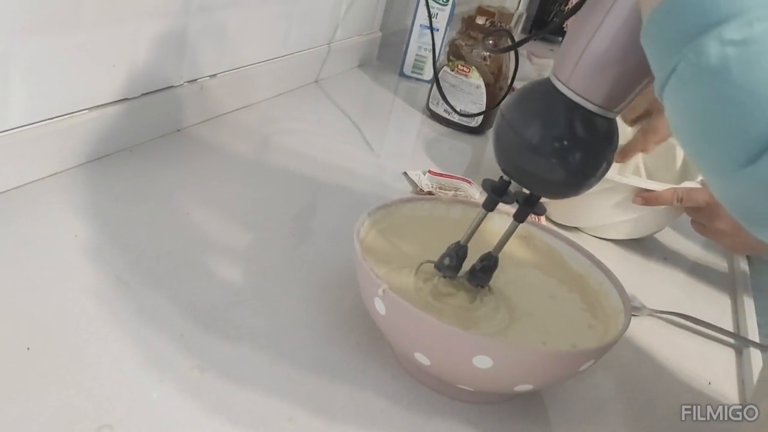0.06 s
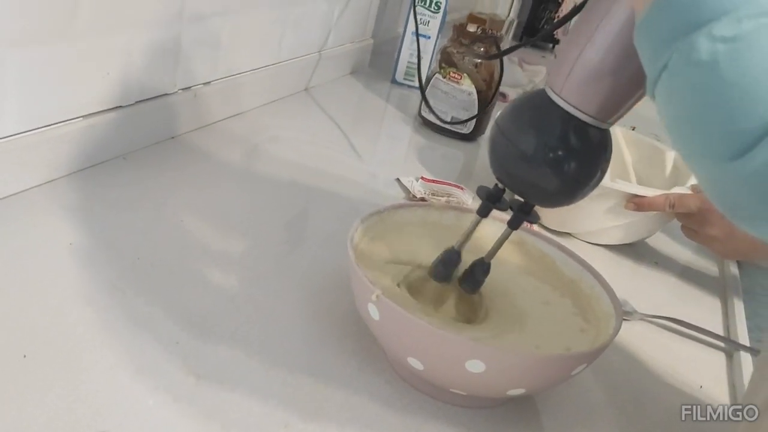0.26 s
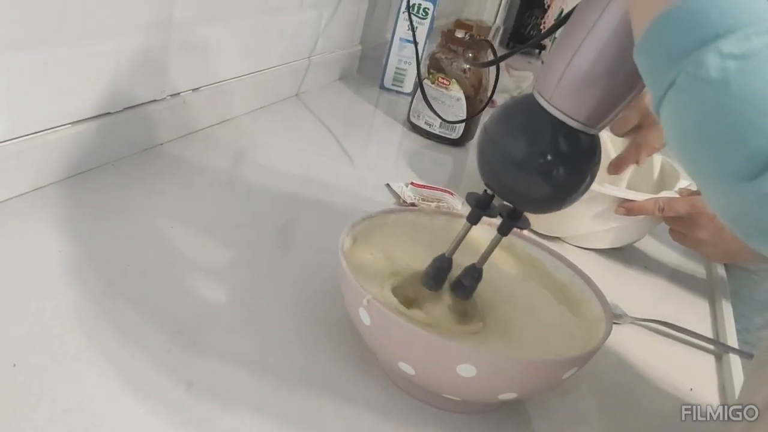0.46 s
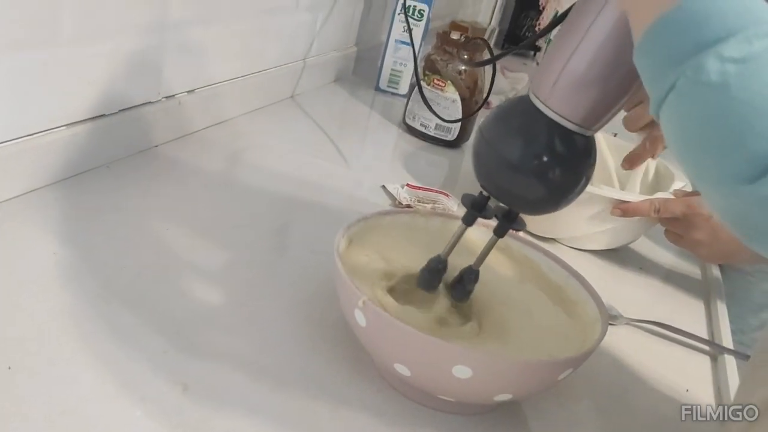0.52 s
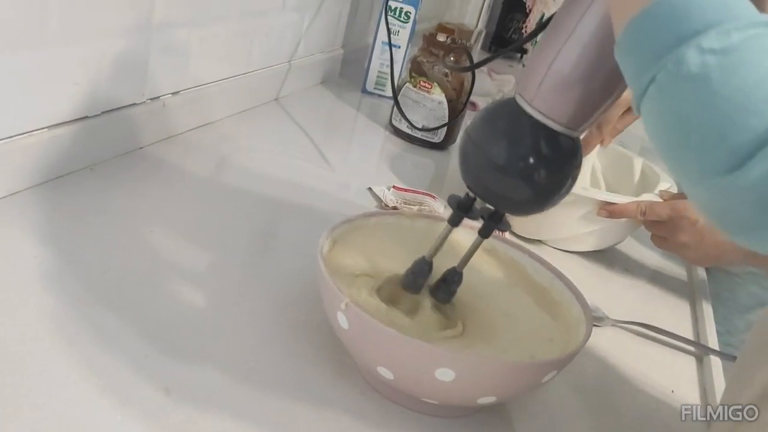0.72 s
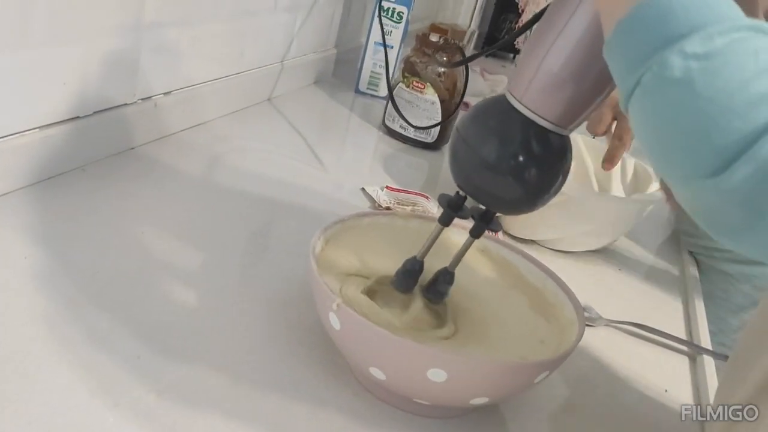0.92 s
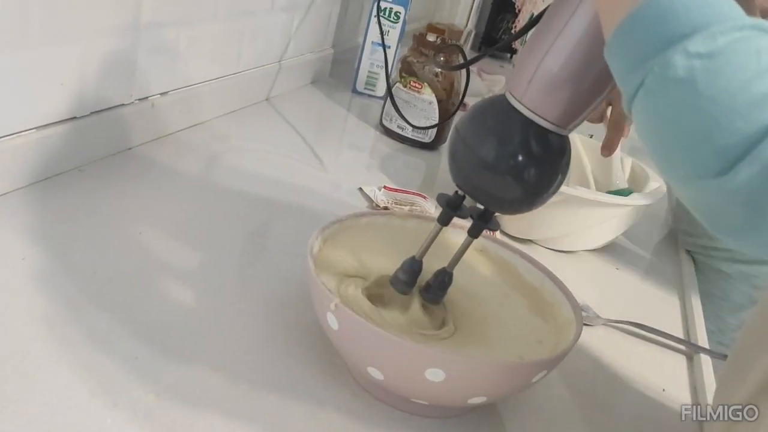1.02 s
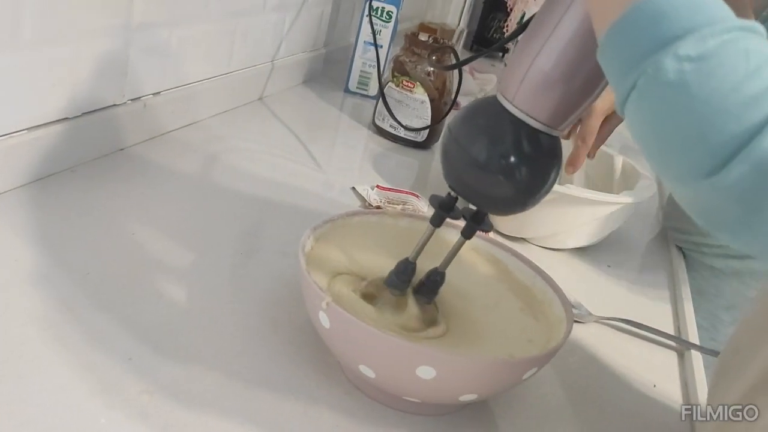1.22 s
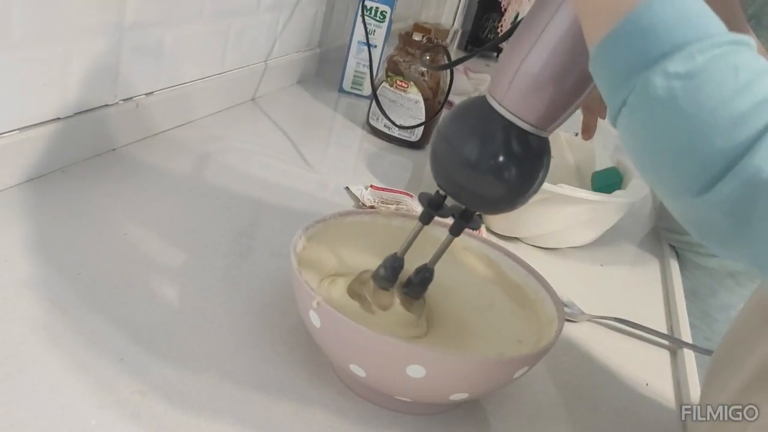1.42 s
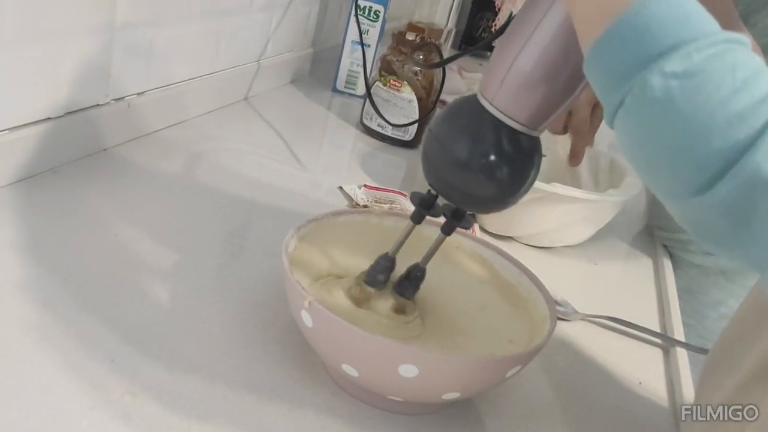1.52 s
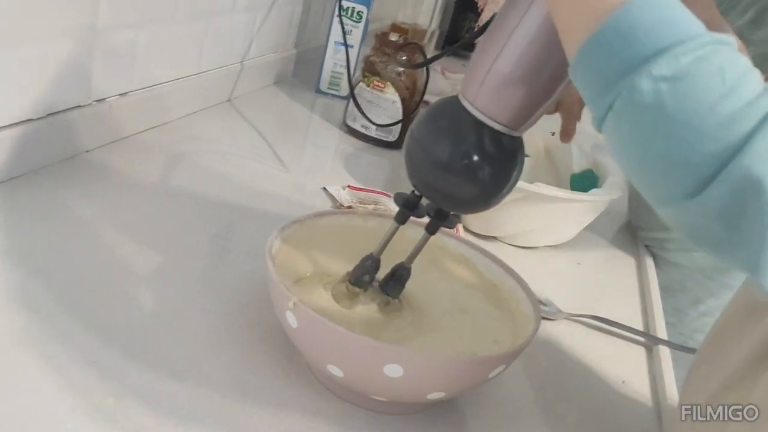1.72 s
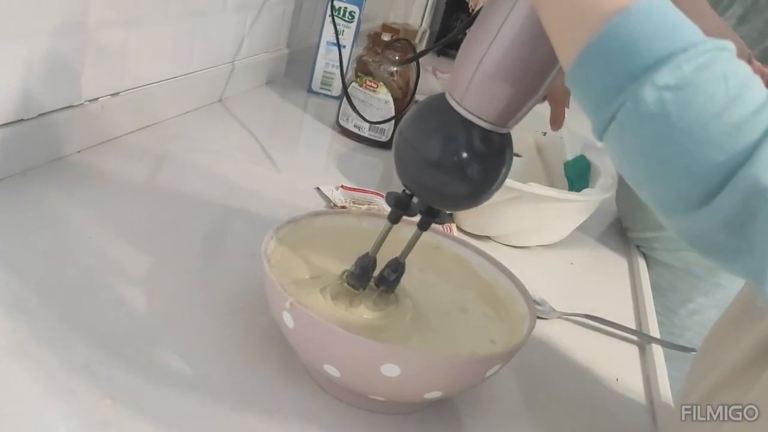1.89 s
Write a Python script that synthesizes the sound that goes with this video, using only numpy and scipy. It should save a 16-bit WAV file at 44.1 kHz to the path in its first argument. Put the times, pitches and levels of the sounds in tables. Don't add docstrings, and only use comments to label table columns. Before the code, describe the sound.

After a brief quiet and a switch click, a hand mixer whirs with gear rattle and brush hiss, shaking the bowl on the counter, then its whine slides down to near silence, heard close in stereo.

```python
import sys
import numpy as np
from scipy import signal
from scipy.fft import rfft, irfft
from scipy.io import wavfile
from scipy.ndimage import uniform_filter1d, minimum_filter1d

SR = 44100
rng = np.random.default_rng(int(sys.argv[2]) if len(sys.argv) > 2 else 0)


def how_loud(loudness_db):
    steps = np.asarray(loudness_db, float) / 20
    return 10 ** steps


def persist_wave(psi):
    counts = np.round(np.clip(psi, -1, 1) * 32767).astype(np.int16)
    wavfile.write(sys.argv[1], SR, np.atleast_2d(counts).T)


N = 85995
T = np.arange(N) / SR

# freq_hz, level_db
FLOOR_SPECTRUM = [(18, -42), (30, -2), (187, -0.5), (532, -7), (639, -8.5), (767, -13.5), (5040, -18),
                  (9190, -21.5), (15500, -19)]
# freq_hz, gain_db
MIC_RESPONSE = [(30, 2), (3000, 1), (5500, 3.5), (7500, 14), (8600, 10.5), (9500, -7), (10800, -28.5),
                (15000, -23)]
# freq_hz, likeness_0_to_1
CHANNEL_LIKENESS = [(60, 0.65), (180, 0.81), (550, 0.1), (1650, 0.13), (4200, 0.16), (7500, 0.8),
                    (9000, 0.52), (15000, 0.29)]
# freq_hz, left_minus_right_db
CHANNEL_BALANCE = [(60, 3), (200, 2), (700, 1.5), (2500, -1.5), (5000, -2.5), (7300, -8), (8300, 1),
                   (12000, -0.5)]
# time_s, level_db, length_s
RUSTLES = [
    (0.05, -53, 0.013),
    (0.184, -46.5, 0.0088),
    (0.238, -18.5, 0.00055),
    (1.38, -25, 0.0028),
]
# time_s, speed_hz
SHAFT_SPEED = [(.21, 15.3), (.228, 117), (.257, 207), (.3, 284), (.35, 299), (.45, 295), (.6, 303),
               (1.25, 303), (1.32, 275), (1.38, 244), (1.47, 193), (1.57, 148.6), (1.65, 113.5),
               (1.76, 74.3), (1.85, 39), (1.95, 25)]
# time_s, level_db
MOTOR_EFFORT = [(.2, -56), (.214, -52), (.238, -32), (.28, -19.5), (.33, -16), (.5, -12.5), (.9, -13.5),
                (1.2, -13.5), (1.33, -14.5), (1.5, -23), (1.7, -36.5), (1.82, -51.5), (1.94, -80)]
# freq_hz, level_db
RATTLE_SPECTRUM = [(25, -23), (60, -34), (130, -2), (270, -14), (460, -1.5), (1000, -5), (2000, -0.5),
                   (4000, -14)]
# freq_hz, level_db
HISS_SPECTRUM = [(300, -39), (1200, -3), (3200, -5), (4200, 1), (5200, 0), (7600, -1.5), (12000, -3),
                 (15500, -2)]
# freq_hz, width_hz, level_db
BODY_MODES = [(209, 43, -39.5), (345.5, 24, -43.5), (465, 6.4, -43.5), (652.7, 12, -50), (760.4, 3.7, -45),
              (4440, 54, -57), (2000, 500, -46), (1232, 300, -39)]
# freq_hz, level_db
KNOCK_RESPONSE = [(17, -71), (35, -44.5), (52, -47), (69, -37.5), (110, -57.5), (170, -51), (192, -31),
                  (215, -41.5), (270, -62), (700, -50)]
# time_s, level_db
BOWL_CONTACT = [(.27, -40), (.33, -13), (.42, 0), (.62, -5.5), (.75, 0), (1.29, 1.5), (1.34, -5.5),
                (1.45, -3), (1.62, -4), (1.67, -24)]
# shaft_hz, level_db
UNBALANCE = [(40, -60), (120, -49.5), (165, -41), (200, -29.5), (235, -39), (270, -58), (310, -52)]
# time_s, level_db
COUNTER_ROCKING = [(.22, -32), (.29, -1), (.34, 12), (.39, 3.5), (1.25, -8.5), (1.45, 10), (1.66, 0.5),
                   (1.78, -3.5), (1.95, -10)]
# shaft_multiple, level_db, wander_hz
WHINE_ORDERS = [(13.016, -41, 11.93), (14.006, -42.5, 29.25), (14.61, -42, 200), (14.93, -48.5, 60),
                (26.32, -48, 300), (38.56, -48.5, 77), (40.84, -45.5, 140), (40.67, -38.5, 170),
                (43.4, -52.5, 99), (58.7, -42.5, 70)]
COMB_LEVELS_DB = [-55.5, -52.5, -44.5, -47, -41, -49.5, -54.5, -46]
COMB_ORDERS = np.arange(23, 31)
# freq_hz, width_hz, gain_db
HOUSING_MODES = [(826, 66, 4), (1330, 310, 10), (1955, 480, 8), (2695, 94, 3), (4220, 860, -6.5),
                 (5640, 1170, 2), (7260, 740, -1.5), (11700, 2220, 15.5)]

MOTOR_ON_S = SHAFT_SPEED[0][0]
SHAFT_TURNS_PER_BEATER_TURN = 17.15
RATTLE_SHARE = 0.52


def evened(x):
    return x / np.sqrt(np.mean(x ** 2) + 1e-20)


def read(points, hz):
    f, value = np.transpose(points)
    return np.interp(np.log(hz + 1), np.log(f + 1), value)


def curve(points):
    return np.interp(T, *np.transpose(points))


def colour(x, points, scale=1):
    gain_db = scale * read(points, np.fft.rfftfreq(N, 1 / SR))
    return irfft(rfft(x) * how_loud(gain_db), N)


def resonate(x, hz, width_hz):
    return signal.lfilter(*signal.iirpeak(hz, hz / width_hz, SR), x)


def slow(rate_hz):
    hz = np.fft.rfftfreq(N, 1 / SR)
    return evened(irfft(rfft(rng.standard_normal(N)) / (1 + (hz / rate_hz) ** 2), N))


def pair(x):
    same = np.clip(read(CHANNEL_LIKENESS, np.fft.rfftfreq(N, 1 / SR)), 0, 1)
    z = rfft(x)
    return irfft([z[0], same * z[0] + np.sqrt(1 - same ** 2) * z[1]], N)


def noise_floor():
    floor = evened(colour(pair(rng.standard_normal((2, N))), FLOOR_SPECTRUM))
    return colour(how_loud(-52) * floor, MIC_RESPONSE, scale=-0.68)


def room(x):
    t60_s, density, gap_s = 0.26, 0.05, 0.002
    t = np.arange(SR // 2) / SR
    sign = rng.choice([-1., 1.], (2, len(t)))
    hit = rng.random((2, len(t))) < density
    taps = sign * hit * how_loud(-60 * t / t60_s) * (t > gap_s)
    return signal.fftconvolve(x[None], taps / np.linalg.norm(taps[0]), axes=1)[:, :N]


def rustles():
    shape = sum(how_loud(db) * np.exp(-np.abs(T - s) / length_s) for s, db, length_s in RUSTLES)
    puff = np.diff(rng.standard_normal(N + 1)) + 1.24 * rng.standard_normal(N)
    return how_loud(-3.5) * shape * puff


def effort(share):
    onset_s = 0.014
    db = curve(MOTOR_EFFORT)
    return how_loud(share * (db - db.max())) * np.clip((T - MOTOR_ON_S) / onset_s, 0, 1)


def beater_turns():
    return np.cumsum(curve(SHAFT_SPEED)) / SR / SHAFT_TURNS_PER_BEATER_TURN


def gritty():
    ticks_per_s, ticks_db, spread_db, beat_depth = 1300, -3, 2.5, 0.24
    tick_level = how_loud(spread_db * np.minimum(rng.exponential(1, N), 5))
    ticks = tick_level * (rng.random(N) < ticks_per_s / SR)
    shape = evened(signal.lfilter([1], [1, -0.96], ticks))
    beat = 1 + beat_depth * np.cos(4 * np.pi * beater_turns()) * np.tanh(1 + slow(16))
    drift = how_loud(1.0 * slow(5.9))
    return rng.standard_normal((2, N)) * (1 + how_loud(ticks_db) * shape) * beat * drift


def gear_rattle():
    return how_loud(-25.5) * effort(RATTLE_SHARE) * evened(colour(pair(gritty()), RATTLE_SPECTRUM))


def brush_hiss():
    return how_loud(-23.5) * effort(0.85) * evened(colour(pair(gritty()), HISS_SPECTRUM))


def body():
    out = np.zeros(N)
    for hz, width_hz, db in BODY_MODES:
        out += how_loud(db) * evened(resonate(gritty()[0], hz, width_hz))
    return out * effort(RATTLE_SHARE)


def knock():
    knock_share, counter_hz, counter_width_hz, counter_db = 0.27, 50.5, 7.4, -43
    turns = beater_turns()
    shaft_hz = curve(SHAFT_SPEED)
    beater_hz = shaft_hz / SHAFT_TURNS_PER_BEATER_TURN
    strikes = np.zeros(N)
    for k in range(1, 44):
        level = how_loud(read(KNOCK_RESPONSE, k * beater_hz) + 2.0 * slow(4.5))
        strikes += level * np.cos(2 * np.pi * (k * turns + rng.random()))
    strikes = strikes * effort(knock_share) * how_loud(curve(BOWL_CONTACT))
    shake = evened(resonate(rng.standard_normal(N), counter_hz, counter_width_hz))
    rocking = how_loud(counter_db + curve(COUNTER_ROCKING)) * shake
    hum = np.cos(2 * np.pi * SHAFT_TURNS_PER_BEATER_TURN * turns) * (T > MOTOR_ON_S)
    return strikes + rocking + how_loud(read(UNBALANCE, shaft_hz) + 1.3 * slow(22)) * hum


def whine():
    coast_s, settle_s, start_db = 1.323, 0.35, 4.5
    moving_wander, comb_wander_hz, leak_db = 2.5, 8.94, -5
    shaft_hz = curve(SHAFT_SPEED)
    coast = np.clip((T - coast_s) / 0.0816, 0, 1)
    start = np.clip((settle_s - T) / 0.0812, 0, 1)
    comb = [(order, db, comb_wander_hz) for order, db in zip(COMB_ORDERS, COMB_LEVELS_DB)]
    out = np.zeros(N)
    for order, db, wander_hz in list(WHINE_ORDERS) + comb:
        wander = wander_hz * (1 + moving_wander * (coast + start)) * slow(82.85)
        level = how_loud(db + 1 + 5.5 * np.tanh(slow(66)))
        out += level * np.sin(2 * np.pi * np.cumsum(order * shaft_hz + wander) / SR)
    out = out * how_loud(start_db * start) * effort(0.44)
    housing = sum(how_loud(db) * resonate(out, hz, width_hz) for hz, width_hz, db in HOUSING_MODES)
    return how_loud(leak_db) * out + housing


def scene():
    near = rustles() + whine()
    echoes = how_loud(1.5) * room(near)
    return noise_floor() + echoes + gear_rattle() + brush_hiss() + body() + knock() + near


def roll_off(x):
    return signal.sosfilt(signal.butter(12, 15700, fs=SR, output="sos"), x)


def record(dry):
    ceiling = 0.97
    wet = colour(dry, MIC_RESPONSE)
    left = colour(wet[0], CHANNEL_BALANCE, scale=1 / 2)
    right = colour(wet[1], CHANNEL_BALANCE, scale=-1 / 2)
    wet = np.array([left, right])
    gain = minimum_filter1d(ceiling / np.maximum(abs(wet).max(0), ceiling), size=257)
    wet = wet * uniform_filter1d(uniform_filter1d(gain, size=128), size=128)
    return roll_off(wet)


dry = scene()
out = record(dry)
persist_wave(out)
```